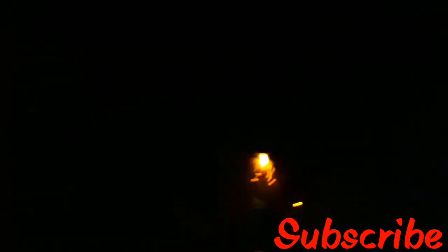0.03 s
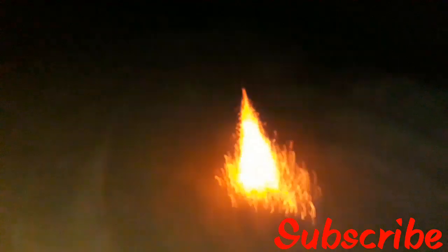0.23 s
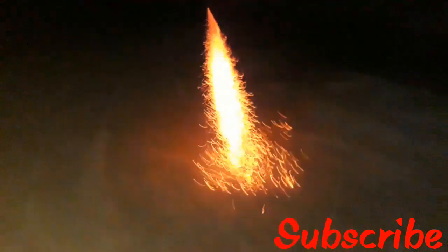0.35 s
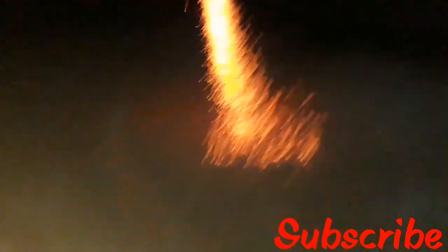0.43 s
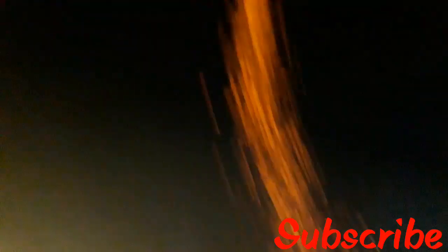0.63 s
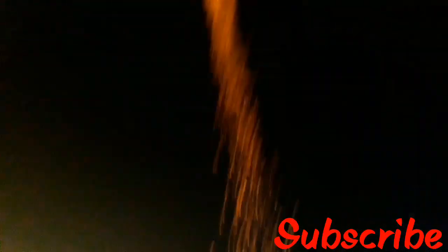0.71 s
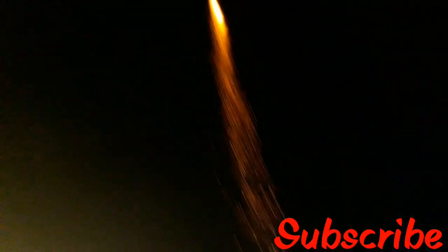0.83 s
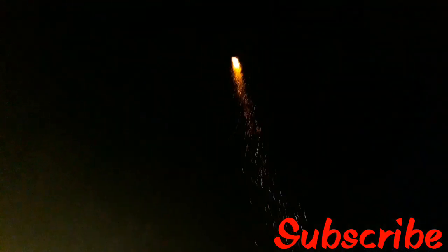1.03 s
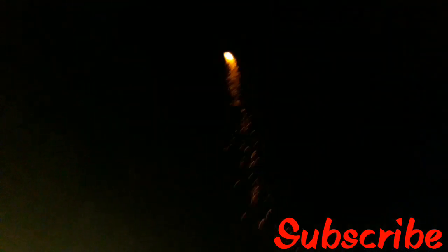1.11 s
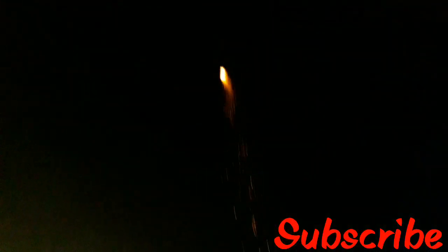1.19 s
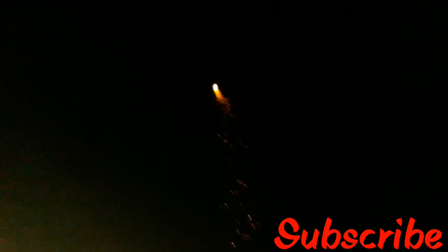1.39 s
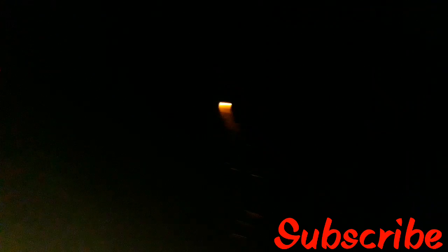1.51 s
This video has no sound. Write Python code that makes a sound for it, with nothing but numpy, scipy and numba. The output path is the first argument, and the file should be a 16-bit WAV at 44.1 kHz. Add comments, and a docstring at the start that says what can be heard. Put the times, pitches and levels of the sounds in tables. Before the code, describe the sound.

A small firework rocket takes off close to a phone on a quiet night. A faint tick at 0.08 seconds, then bright spits and a sharp burst around 0.2. A loud, bright hiss rushes until about 0.85, with rough, distorted buffets and pops hitting the microphone, strongest at 0.4-0.75. It turns duller and fades by 1.05; a short thumping burst at 1.17-1.2, then faint distant hiss and near silence.

```python
"""A small rocket motor lights and lifts off at night near a phone: coloured noise, bright close by, duller in the climb.
Bright spits, shaped noise bursts, mark the charge catching.
Its draught buffets the microphone in rough bursts of band noise and single pops, each a windowed sine.
A limiter ducks the hiss under them. A low breeze and a quiet night, both coloured noise, lie beneath."""
import sys
import numpy as np
from scipy import signal
from scipy.fft import rfft, irfft
from scipy.io import wavfile
from scipy.ndimage import uniform_filter1d
from numba import njit

SR = 44100
rng = np.random.default_rng(int(sys.argv[2]) if len(sys.argv) > 2 else 0)


def ratio(d):
    """dB to gain"""
    e = np.asarray(d, float) / 20
    return 10 ** e


def file_out(sig):
    """Save sig as 16-bit WAV at sys.argv[1]."""
    # one column per channel
    cols = np.atleast_2d(sig).T
    # limit, then scale
    lim = np.clip(cols, -1, 1)
    pcm = np.round(lim * 32767).astype(np.int16)
    wavfile.write(sys.argv[1], SR, pcm)


N = 68355

# night noise colour: pitch_hz, density_db_per_hz
NIGHT_COLOUR = [(40, 0), (120, -1.5), (400, -15), (1200, -18), (3500, -32.5), (6000, -18.5), (15000, -50)]
NIGHT_DB = -59

# motor course: time_s, jet_level_db, far_power_share_0_to_1, spark_level_db
MOTOR_COURSE = [(.077, -63, 0, -81), (.086, -36.5, 0.43, -52), (.12, -50, 0.18, -107),
                (.177, -50, 0.5, -55), (.198, -24.5, 0.02, -35), (.228, -23, 0, -28.5),
                (.239, -5.5, 0.15, -20), (.244, -24.5, 0.06, -31.5), (.29, -20.5, 0, -28),
                (.36, -19.5, 0, -34), (.44, -17, 0.1, -30.5), (.52, -21, 0.4, -32.5), (.6, -20, 0.94, -28),
                (.68, -18, 0.96, -26), (.725, -19, 0.87, -32), (.733, -15, 1, -25.5),
                (.83, -18.5, 0.95, -34), (.86, -25, 0.89, -40.5), (.935, -28.5, 0.93, -48),
                (.96, -34.5, 0.88, -55.5), (1.05, -43, 0.83, -64), (1.17, -47.5, 0.88, -75),
                (1.55, -53.5, 0.77, -80.5)]
# jet colour close by: pitch_hz, density_db_per_hz
NEAR_COLOUR = [(60, -28), (200, -12.5), (900, -5), (3300, -8), (4700, 0), (7000, -3), (8500, -21.5),
               (16000, -13)]
# jet colour far off: pitch_hz, density_db_per_hz
FAR_COLOUR = [(60, 1.5), (400, -17), (1100, -7.5), (2100, -4.5), (2500, 0), (3000, 3.5), (3500, -3.5),
              (4000, -12), (6200, -13), (8200, -28), (16000, -60)]
# spark sizzle colour: pitch_hz, density_db_per_hz
SPARK_COLOUR = [(7000, -2.5), (9600, -3.5), (11000, 2.5), (12500, -1.5), (14000, -11), (15800, -15),
                (16400, -52)]
FLICKER_DB, FLICKERS_PER_S = 0.9, 30
SPUTTER_DB, SPUTTERS_PER_S = 1.5, 120

# breeze colour: pitch_hz, density_db_per_hz
BREEZE_COLOUR = [(40, -12), (70, -8), (170, -14), (400, -25), (1000, -45)]
BREEZE_DB, BREEZE_SWAY_DB, BREEZE_SWAYS_PER_S = -64, 5.6, 25.84
STIRRED_S = 0.066  # no breeze before this

# buffets of air on the microphone: start_s, length_s, level_db, upper_corner_hz
BUFFET_EVENTS = [(0.076, 0.025, -38, 1340), (0.208, 0.035, -27.5, 2140), (0.232, 0.023, -36.5, 248),
                 (0.404, 0.074, -22.5, 446), (0.451, 0.021, -2, 1630), (0.473, 0.026, -3.5, 2600),
                 (0.495, 0.011, -7, 2010), (0.513, 0.034, -24, 1810), (0.608, 0.03, -8, 2850),
                 (0.904, 0.022, -35.5, 190), (0.927, 0.019, -33.5, 158), (0.964, 0.108, -49, 1300),
                 (1.059, 0.063, -51, 1220), (1.159, 0.0059, -34, 1000), (1.167, 0.019, -29.5, 2770),
                 (1.183, 0.023, -14, 2220), (1.184, 0.015, -15, 326), (1.197, 0.0084, -20, 1780),
                 (1.304, 0.012, -49.5, 917), (1.527, 0.026, -49, 189)]
BUFFET_ATTACK_S, BUFFET_RELEASE_S = 0.0047, 0.0039
EDDY_DB, EDDIES_PER_S = 2.5, 380
BODY_HZ, BODY_DB = 355, -7  # slow, large eddies are stronger
BUFFET_LOW_HZ, BUFFET_TOP_HZ = 74, 5100
RASP_HZ, RASP_DB = 9300, -6.5  # thin rasp on top of each buffet

# single pops: start_s, peak_db, pitch_hz, first_swing_sign, build_up_cycles
POP_EVENTS = [(0.081, -16.5, 533, -1, 0.041), (0.135, -30.5, 140, 1, 4.4), (0.161, -29, 254, -1, 0.42),
              (0.232, -12, 1887, 1, 12.7), (0.4224, -3, 490, -1, 0.51), (.4532, 1.5, 930, -1, 0.64),
              (0.571, -4, 1480, -1, 0.77), (0.6103, -2.5, 940, 1, 0.29), (0.6735, -16.5, 202, 1, 0.11),
              (0.6885, -8, 300, 1, 0.037), (0.7205, 0, 940, -1, 1.13), (0.777, -5, 265, 1, 0.087),
              (1.0043, -17, 910, -1, 0.71), (1.0344, -30.5, 600, 1, 0.8), (1.0473, -24, 1310, 1, 0.61),
              (1.0605, -30.5, 760, 1, 0.85), (1.1695, -13.5, 298, 1, 0.08), (1.1843, -3, 486, 1, 0.11)]
POP_CYCLES = 0.52  # least width of the window

# bright spits while the charge catches: start_s, level_db, t60_s
SPIT_EVENTS = [(0.0826, -27.5, 0.012), (0.18, -33, 0.026), (0.201, -19.5, 0.06), (0.2194, -14, 0.091)]
# spit colour: pitch_hz, density_db_per_hz
SPIT_COLOUR = [(300, -40), (1500, -0.5), (4000, -1.5), (7500, 7.5), (9000, -13), (16000, -24)]

MIC_LOW_HZ = 60.7
LIMIT_DB, RATIO, LIMIT_ATTACK_S, LIMIT_RELEASE_S = -13.5, 1.96, 0.0013, 0.01
# wandering treble ceiling: time_s, ceiling_hz
TREBLE_CEILING = [(.3, 15900), (.47, 12200), (.53, 13400), (.67, 15000), (.95, 13600), (1.05, 12300),
                  (1.17, 12300), (1.195, 16000), (1.22, 12500)]


def curve(rows, col):
    """A table column interpolated over time."""
    rows = np.array(rows, float)
    return np.interp(np.arange(N) / SR, rows[:, 0], rows[:, col])


def noise(points):
    """Gaussian noise of unit rms with the given spectrum."""
    hz, db = np.array(points, float).T
    f = np.fft.rfftfreq(N, 1 / SR) + 1  # + 1 keeps the log finite
    gain = ratio(np.interp(np.log(f), np.log(hz), db, left=-60))
    x = irfft(rfft(rng.standard_normal(N)) * gain, N)
    return x / np.std(x)


def walk(rate, size=N):
    """Random levels held 1 / rate s and slewed; spread near 1."""
    k = int(SR / rate)
    held = np.repeat(rng.standard_normal(size // k + 1), k)
    return 1.11 * uniform_filter1d(held, k)[:size]


@njit
def follow(x, up, down):
    """One-pole envelope with separate rates for rise and fall."""
    e, out = 0., np.empty(len(x))
    for i in range(len(x)):
        e += (x[i] - e) * (up if x[i] > e else down)
        out[i] = e
    return out


def night():
    """Steady, quiet coloured noise."""
    return ratio(NIGHT_DB) * noise(NIGHT_COLOUR)


def flicker():
    """Random gain for one part of the motor."""
    return ratio(FLICKER_DB * walk(FLICKERS_PER_S))


def motor():
    """Jet noise crossfades in power between near and far colours; parts flicker alone, all sputter together."""
    far = np.clip(curve(MOTOR_COURSE, 2), 0, 1)
    near_jet = np.sqrt(1 - far) * noise(NEAR_COLOUR) * flicker()
    far_jet = np.sqrt(far) * noise(FAR_COLOUR) * flicker()
    jet = ratio(curve(MOTOR_COURSE, 1)) * (near_jet + far_jet)
    sparks = ratio(curve(MOTOR_COURSE, 3)) * noise(SPARK_COLOUR) * flicker()
    sputter = ratio(SPUTTER_DB * walk(SPUTTERS_PER_S))
    return (jet + sparks) * sputter


def breeze():
    """Low noise of wavering level, once the air is stirred."""
    level = ratio(BREEZE_DB + BREEZE_SWAY_DB * walk(BREEZE_SWAYS_PER_S))
    stirred = np.arange(N) > STIRRED_S * SR
    return level * noise(BREEZE_COLOUR) * stirred


def buffets():
    """Eddies of uneven size push the membrane; faster air reaches higher."""
    out, t = np.zeros(N), np.arange(SR // 10) / SR
    body_filter = signal.butter(1, BODY_HZ, fs=SR, output="sos")
    for start, length, db, hz in BUFFET_EVENTS:
        air = rng.standard_normal(len(t)) * ratio(EDDY_DB * walk(EDDIES_PER_S, size=len(t)))
        air = air + ratio(BODY_DB) * signal.sosfilt(body_filter, air)
        band = [BUFFET_LOW_HZ + hz / 40, hz]
        air = signal.sosfilt(signal.butter(2, band, "band", fs=SR, output="sos"), air)
        attack = np.clip(t / BUFFET_ATTACK_S, 0, 1)
        release = np.exp(-np.clip(t - length, 0, 1) / BUFFET_RELEASE_S)
        burst = ratio(db) * air * attack * release / np.std(air[t < length])
        i = int(start * SR)
        out[i:i + len(t)] += burst[:N - i]
    rasp = signal.sosfilt(signal.butter(4, RASP_HZ, "high", fs=SR, output="sos"), out)
    main = signal.sosfilt(signal.butter(4, BUFFET_TOP_HZ, fs=SR, output="sos"), out)
    return main + ratio(RASP_DB) * rasp


def pops():
    """One pressure swing and its rebound; a pop that builds up slowly rings on as long."""
    out, t = np.zeros(N), np.arange(SR // 10) / SR
    for start, db, hz, sign, lead in POP_EVENTS:
        width = max(POP_CYCLES, lead / 2)
        window = np.exp(-((t * hz - lead) / width) ** 2)
        swing = np.sin(2 * np.pi * hz * t) * window
        i = int(start * SR)
        out[i:i + len(t)] += np.sign(sign) * ratio(db) * swing / np.abs(swing).max()
    return out


def spits():
    """Short bright cracks: coloured noise with instant onset and exponential fade."""
    t, shape = np.arange(N) / SR, np.zeros(N)
    for start, db, t60 in SPIT_EVENTS:
        fade_db = 60 * np.clip(t - start, 0, 1) / t60
        shape += ratio(db - fade_db) * (t > start)
    return shape * noise(SPIT_COLOUR)


def scene():
    """Sum of all sources, one channel."""
    return (night() + motor() + breeze() + buffets() + pops() + spits())[None]


def microphone(x):
    """High-pass: the microphone drops the deep bass."""
    return signal.sosfilt(signal.butter(2, MIC_LOW_HZ, "high", fs=SR, output="sos"), x)


def limiter(x):
    """Gain falls by the ratio while the envelope is over the threshold; peaks clip at full scale."""
    envelope = follow(np.abs(x), 1 / (LIMIT_ATTACK_S * SR), 1 / (LIMIT_RELEASE_S * SR))
    under = np.minimum(1, ratio(LIMIT_DB) / (envelope + 1e-9))
    return np.clip(x * under ** (1 - 1 / max(RATIO, 1)), -1, 1)


def cut_treble(x):
    """Zeroes the spectrum above the wandering ceiling."""
    f, t, z = signal.stft(x, SR, nperseg=512)
    z = z * (f[:, None] < np.interp(t, *np.array(TREBLE_CEILING).T))
    return signal.istft(z, SR, nperseg=512)[1][:N]


def band_limit(x):
    """A steep low-pass at the top of the band."""
    return signal.sosfilt(signal.butter(12, 16520, fs=SR, output="sos"), x)


def record(dry):
    """Microphone, limiter, treble cut."""
    mix = cut_treble(limiter(microphone(dry[0])))[None]
    return band_limit(mix)


dry = scene()
out = record(dry)
file_out(out)
```